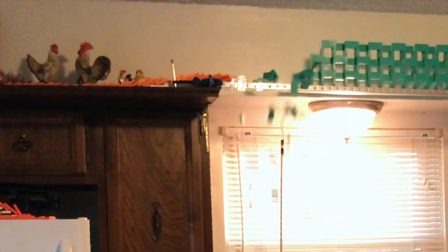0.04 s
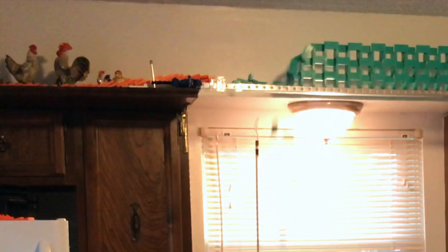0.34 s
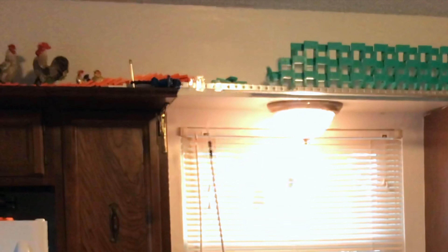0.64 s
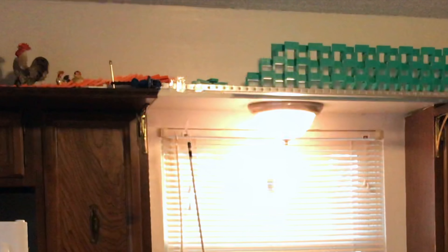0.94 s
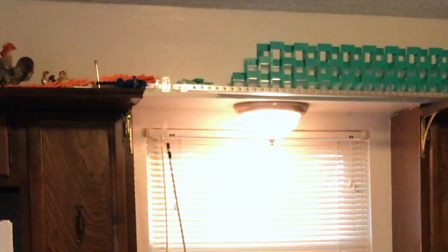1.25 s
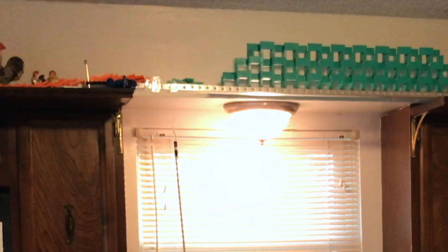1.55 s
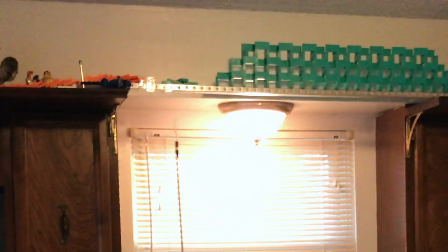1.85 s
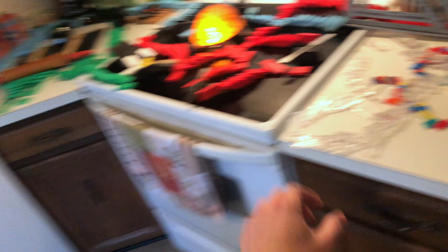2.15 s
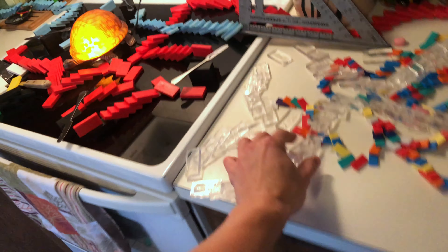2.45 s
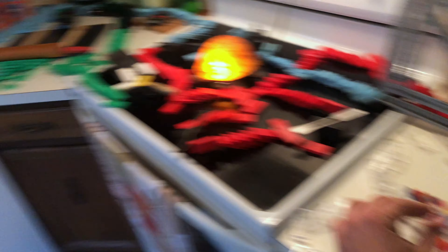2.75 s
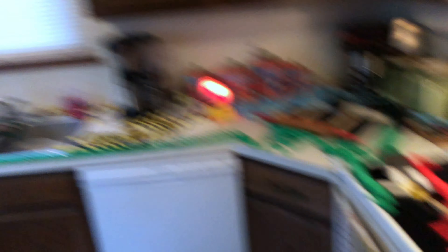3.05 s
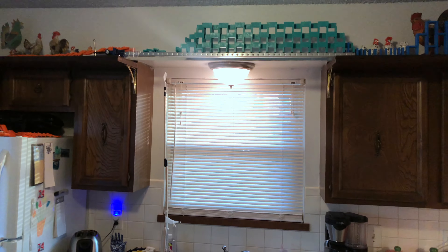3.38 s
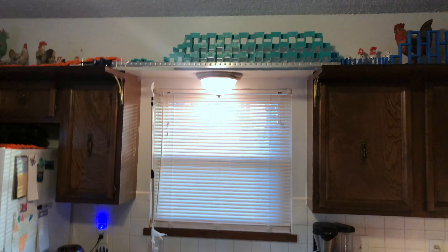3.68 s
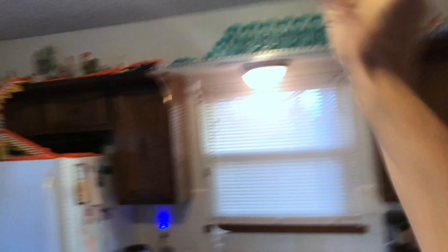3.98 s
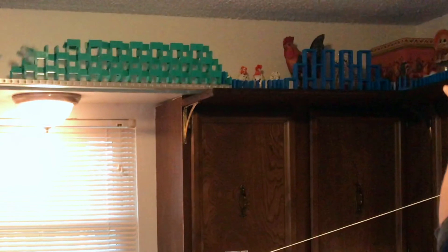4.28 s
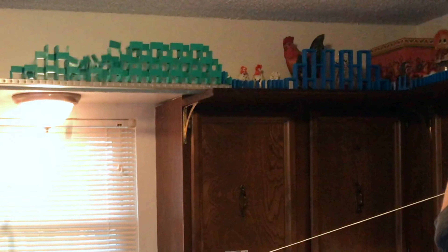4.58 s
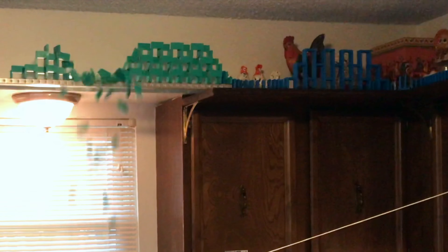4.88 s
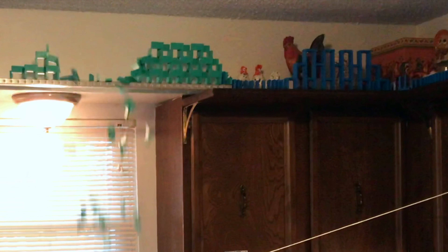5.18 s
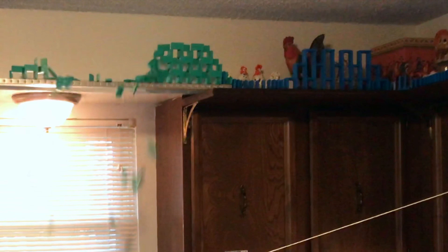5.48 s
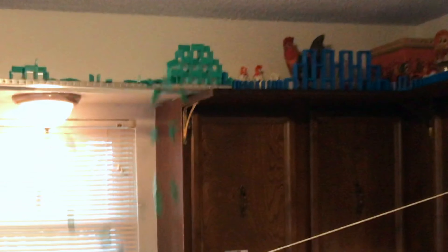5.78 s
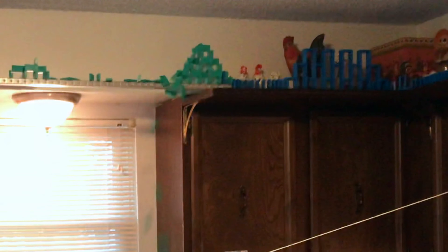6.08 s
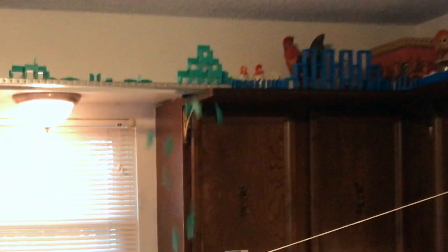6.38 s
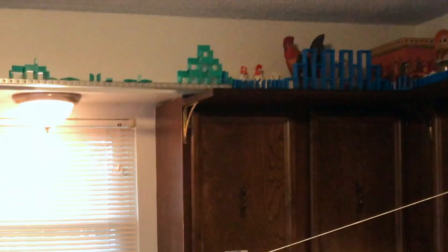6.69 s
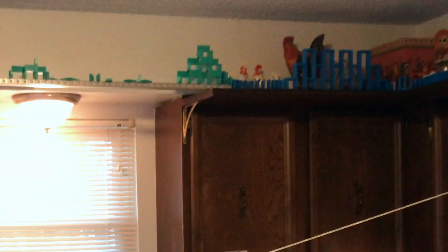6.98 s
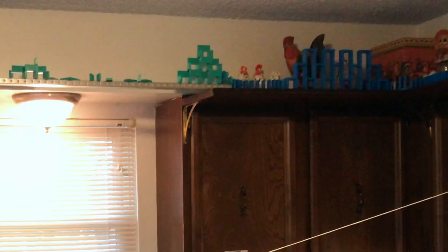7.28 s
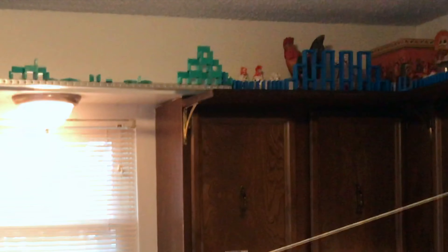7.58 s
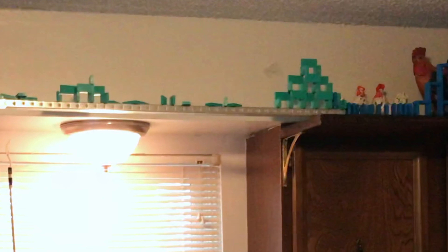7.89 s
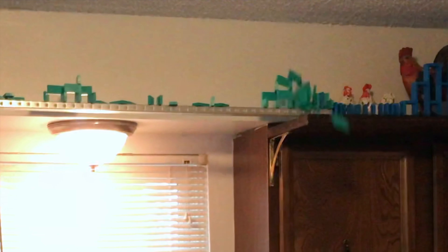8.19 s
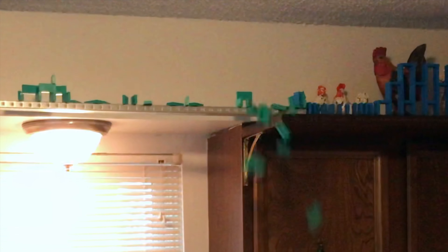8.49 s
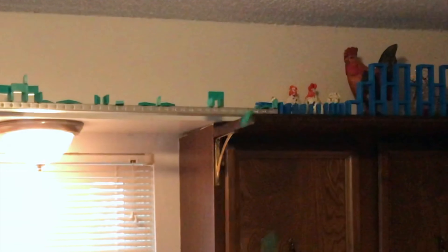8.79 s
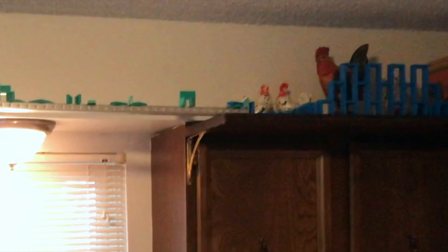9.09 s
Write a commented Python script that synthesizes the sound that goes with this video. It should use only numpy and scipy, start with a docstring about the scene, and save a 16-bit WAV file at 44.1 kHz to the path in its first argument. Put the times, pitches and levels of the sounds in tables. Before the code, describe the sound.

A rapid clatter of toppling plastic dominoes bouncing off wood stops briefly, then resumes, over a faint kitchen appliance hum.

```python
"""A hard little kitchen, heard from one microphone: walls of small plastic dominoes collapse on a high
shelf, and pieces clack together and drop on wooden cabinets. Each big fall is a clack, a knock or a
ringing bounce, buried in near echoes, and stirs up a tumble of smaller contacts. In a pause, lighter
plastic pieces clink close by and the camera is handled. An appliance hums under the room air."""
import sys
import numpy as np
from scipy import signal
from scipy.fft import rfft, irfft, next_fast_len
from scipy.io import wavfile

SR = 44100
rng = np.random.default_rng(int(sys.argv[2]) if len(sys.argv) > 2 else 0)


def unload_audio(sound):
    """Save the sound as a 16-bit wav file, at the path given as the first command line argument."""
    columns = np.transpose(np.atleast_2d(sound))
    # keep every value between -1 and 1, then stretch to whole-number steps
    steps = np.round(np.clip(columns, -1, 1) * 32767)
    wavfile.write(sys.argv[1], SR, steps.astype(np.int16))


N = 403074
NOW = np.arange(N) / SR
SIZE = 16384  # samples in one blow with its echoes
T, HZ = np.arange(SIZE) / SR, np.fft.rfftfreq(SIZE, 1 / SR)


def amp(db):
    """Decibels to gain."""
    return 10 ** (np.asarray(db) / 20)


def along(points, hz):
    """A curve of (freq_hz, value) points, read on a log frequency axis."""
    freqs, values = np.transpose(points)
    return np.interp(np.log(hz + 1), np.log(freqs + 1), values)


def noise(gain):
    """Noise of rms 1, coloured by a gain function of frequency."""
    size = next_fast_len(N + SIZE)
    white = rfft(rng.standard_normal(size))
    coloured = irfft(white * gain(np.fft.rfftfreq(size, 1 / SR)), size)[:N]
    return coloured / np.sqrt(np.mean(coloured ** 2) + 1e-20)


def unit_power(response):
    """A frequency response scaled to mean power 1."""
    return response / np.sqrt(np.mean(abs(response) ** 2))


def pulse(spectrum):
    """Response of the most sudden pulse that has this spectrum (minimum phase)."""
    cepstrum = irfft(np.log(amp(along(spectrum, HZ))))
    cepstrum[1:SIZE // 2] *= 2
    cepstrum[SIZE // 2 + 1:] = 0
    return unit_power(np.exp(rfft(cepstrum)))


def ringing(modes, detune, count=1):
    """Response of count struck pieces, each tuned a little apart; every blow weights the modes anew."""
    hz, db, t60_s = np.transpose(list(modes) * count)[:, :, None]
    hz = hz * (1 + detune * rng.standard_normal(hz.shape))
    width_hz = np.log(1000) / np.pi / t60_s
    gain = amp(db + 2 * rng.standard_normal(hz.shape)) * rng.choice([-1, 1], hz.shape)
    resonances = 1j * HZ / (hz ** 2 - HZ ** 2 + 1j * HZ * width_hz)
    return unit_power(np.sum(gain * np.sqrt(width_hz) * resonances, 0))


def strike(path, colours, levels_db, crest_db):
    """One blow: each colour goes down the path, the rms of its attack set crest_db under its level."""
    layers = irfft(path * np.array(colours), SIZE)
    attack_rms = np.sqrt(np.mean(layers[:, T < .025] ** 2, 1))
    return (amp(np.array(levels_db) - crest_db) / attack_rms) @ layers


# Moments when all ringing stops dead: time_s
DEAD_STOPS = [2.078, 4.184, 7.789, 10]

def add(out, start_s, sound):
    """Lay a sound in at start_s; it lasts until the next dead stop at most."""
    start = max(0, round(start_s * SR))
    stop_s = min(s for s in DEAD_STOPS if s > start_s)
    stop = min(N, start + SIZE, round(stop_s * SR))
    out[start:stop] += sound[:max(0, stop - start)]


# Reverberation of the kitchen: freq_hz, t60_s
ROOM_DECAY = [(150, 0.42), (500, 0.42), (2500, 0.44), (7000, 0.29), (15000, 0.081)]

def kitchen(tail_db, early_t60_s):
    """Path from one spot to the microphone: cabinet echoes bury the direct sound, then a diffuse tail."""
    hz, t, bands = signal.stft(rng.standard_normal(SIZE), SR, nperseg=256)
    decay = amp(-60 * t / along(ROOM_DECAY, hz)[:, None])
    tail = signal.istft(bands * decay, SR, nperseg=256)[1][:SIZE]
    early = rng.standard_normal(SIZE) * amp(-60 * T / early_t60_s)
    return rfft(amp(tail_db) * tail / np.linalg.norm(tail) + early / np.linalg.norm(early))


# Room tone all round the microphone: freq_hz, relative_db
AIR_SPECTRUM = [(20, -42.5), (40, -8.5), (65, -8), (110, -1), (180, -17), (300, -18), (700, -31.5),
                (2000, -37), (15000, -45.5)]
# An appliance in the room: start_s, end_s, pitch_hz, level_db
APPLIANCE_HUMS = [(0, 2.5, 76.6, -54), (3.18, 4.6, 109, -53), (3.25, 4.15, 238.3, -61),
                  (4.15, 15, 79.8, -50.5)]

def air_and_hum():
    """Steady room air and a wavering appliance hum, made of narrow bands of noise that come and go."""
    out = amp(-52) * noise(lambda hz: amp(along(AIR_SPECTRUM, hz)))
    for start, end, pitch_hz, db in APPLIANCE_HUMS:
        gate = np.interp(NOW, [start - .02, start, end, end + .02], [0, 1, 1, 0])
        out += amp(db) * gate * noise(lambda hz: 1 / (1 + ((hz - pitch_hz) / 9) ** 2))
    return out


# Dull low bumps of the camera body and the cabinets: start_s, level_db, pitch_hz
LOW_BUMPS = [(2.936, -32, 166), (2.97, -35.5, 222), (3.139, -34, 156), (5.278, -18, 190),
             (5.498, -19, 175.5), (7.928, -24, 280), (8.891, -25, 187)]
# Contour of the rustle at the microphone: time_s, level_db
RUSTLE_LEVELS = [(2.17, -50.5), (2.37, -62.5), (2.44, -40), (2.68, -55), (2.9, -67), (3.36, -70.5),
                 (3.44, -57), (3.52, -74), (4.1, -59)]

def bumps_and_rustle():
    """Dull low bumps of the camera body and the cabinets, and a soft rustle while the camera moves."""
    out = np.zeros(N)
    partials = [(.5, -14), (1, 3.5), (1.85, -7)]  # pitch_ratio, relative_db
    for s, db, hz in LOW_BUMPS:
        thud = sum(amp(level) * np.sin(2 * np.pi * hz * ratio * T) for ratio, level in partials)
        envelope = amp(db - 60 * T / .086) * (1 - np.exp(-T / .0062))
        add(out, s, envelope * thud)
    rustle = noise(lambda hz: amp(along([(300, -1), (1500, -6), (4500, -9.5), (15000, -20)], hz)))
    return out + amp(np.interp(NOW, *np.transpose(RUSTLE_LEVELS))) * rustle


# Spectra of plastic faces, plastic edges, the shelf and the hollow cabinet: freq_hz, relative_db
CLACK_SPECTRUM = [(400, -13), (1000, 1.5), (2000, 4), (3000, 7), (4200, 8), (5000, 5), (6300, 4.5),
                  (8500, -5), (15000, -46)]
SNAP_SPECTRUM = [(3500, -46), (6000, -4), (7500, 5), (10000, 5.5), (12500, 3), (15800, 1.5)]
KNOCK_SPECTRUM = [(250, -27), (700, -8.5), (1050, 0.5), (1500, 1.5), (2000, -1), (5000, -19.5)]
THUD_SPECTRUM = [(50, -29), (130, -8.5), (350, 1), (520, 0), (800, 7.5), (2500, -53)]

def impact_pulses():
    """Clack, snap, knock and thud at the point of contact, before the room colours them."""
    return map(pulse, [CLACK_SPECTRUM, SNAP_SPECTRUM, KNOCK_SPECTRUM, THUD_SPECTRUM])


# Modes of a light plastic piece: pitch_hz, relative_db, t60_s
LIGHT_MODES = [(5410, 0, .05), (5841, -13, .04), (10550, -21, .08), (12530, -18, .1), (13610, -19, .08)]
# Light pieces close to the microphone: start_s, level_db, snap_offset_db, ring_offset_db
CLOSE_CLINKS = [(2.3956, -36.5, -32, -18), (2.504, -25, -12, -10), (2.5156, -21, -20, -6),
                (2.5385, -20.5, -10.5, -8), (2.5978, -16.5, -18.5, -1.5), (2.6107, -19, -5, 5.5),
                (2.643, -23, -9.5, -1), (2.6612, -22, -8, -11), (2.7633, -36.5, 6, -12),
                (2.818, -39.5, -2, -11), (2.833, -34.5, -21, -6.5), (3.8636, -39.5, -4.5, -20),
                (4.1412, -16, 2.5, 1), (4.156, -15.5, -4, 7), (4.1762, -25, -12, 2),
                (4.2025, -19.5, 1, 11.5), (4.2212, -18.5, -6, 0), (4.245, -23, -6, 1)]

def clinks():
    """Lighter pieces touch close by: a dry tick, then a higher ring that hangs in the room."""
    out = np.zeros(N)
    clack, snap, _, thud = impact_pulses()
    for s, db, snap_db, ring_db in CLOSE_CLINKS:
        near = kitchen(tail_db=-4.5, early_t60_s=.02)
        ring = ringing(LIGHT_MODES, detune=.007, count=3) * kitchen(tail_db=-2.5, early_t60_s=.026)
        levels_db = db + np.array([0, snap_db, -14, ring_db + 1.5])
        add(out, s, strike(1, [clack * near, snap * near, thud * near, ring], levels_db, crest_db=10.5))
    return out


# Single notes among the falls: start_s, level_db, pitch_hz
MODE_PINGS = [(0.067, -16, 1460), (.366, -14, 14900), (.666, -18.5, 9700), (1.059, -20, 10400),
              (2.024, -35, 10400), (2.398, -36.5, 3300), (5.14, -14.5, 877), (6.09, -19, 484),
              (6.201, -18, 9600), (6.545, -18.5, 470)]

def pings():
    """Now and then a blow excites a single mode of a piece or of the wood."""
    out = np.zeros(N)
    for s, db, hz in MODE_PINGS:
        ring = ringing([(hz, 0, .025)], detune=.002)
        add(out, s, strike(kitchen(tail_db=-1.5, early_t60_s=.03), [ring], [db], crest_db=6))
    return out


# Modes of a domino and of the wooden cabinet: pitch_hz, relative_db, t60_s
DOMINO_MODES = [(4300, 0, .05), (9600, -12, .05), (10680, -14, .05)]
CABINET_MODES = [(160, -8.5, 0.085), (255, -10.5, 0.054), (472.5, -1.5, 0.046), (601, 2, 0.026),
                 (698, -0.5, 0.068), (851, 3.5, 0.011)]
# Walls giving way up on the shelf:
# start_s, peak_s, end_s, level_db, fade_db_per_s, wood_offset_db, hardness_db
WALL_COLLAPSES = [(0, .45, 2.07, -34.5, 4, 3, -0.5), (4.389, 5.368, 6.68, -28, 2, 0.5, -1),
                  (6.736, 6.816, 7.78, -33, 8, 1, 1), (7.95, 8.313, 8.78, -33, 28, -5.5, -8.5),
                  (8.8, 8.95, 9.14, -39.5, 12, 2, 0.5)]

def tumble(contacts_per_s=45):
    """Many weaker pieces tip and skitter at random as each collapse builds and fades."""
    build_db, scatter_db = 7.5, 1.79
    stir_db, settle_s = 6, .098  # each big fall stirs up the loose pieces, which then settle
    wood_growth = 1.99  # the wood swells and fades this many times as far in dB as the plastic
    out = np.zeros(N)
    clack, snap, knock, thud = impact_pulses()
    fall_times = np.array([row[0] for row in DOMINO_CLACKS + WOOD_KNOCKS + FREE_BOUNCES])
    for start, peak, end, db, fade_db_per_s, wood_db, hardness_db in WALL_COLLAPSES:
        for slot in np.arange(round(start * contacts_per_s), round(end * contacts_per_s)):
            s = (slot + rng.random()) / contacts_per_s
            swell_db = np.interp(s, [start, peak], [-build_db, 0]) - fade_db_per_s * max(0, s - peak)
            since_fall_s = s - fall_times[fall_times < s].max(initial=0)
            contact_db = db + stir_db * np.exp(-since_fall_s / settle_s)
            contact_db += scatter_db * rng.standard_normal()
            hard_db = swell_db + hardness_db
            parts_db = np.array([swell_db, hard_db - 5.5, wood_db + wood_growth * swell_db, hard_db - 1])
            wood = knock + amp(-2.5) * thud + amp(-3) * ringing(CABINET_MODES, detune=.0082)
            ring = ringing(DOMINO_MODES, detune=.019)
            room = kitchen(tail_db=1, early_t60_s=.1)
            add(out, s, strike(room, [clack, snap, wood, ring], contact_db + parts_db, crest_db=5))
    return out


def contacts(gap_s, graze_db, bounce_db):
    """A grazing touch, the full blow gap_s later, and two weaker bounces."""
    times = gap_s * np.array([0, 1, 2 + rng.random(), 2 + 2 * rng.random()])
    return amp([graze_db, 0, bounce_db, bounce_db]) @ np.exp(-2j * np.pi * np.outer(times, HZ))


def fall(out, s, db, clack_db=0, snap_db=0, knock_db=0, thud_db=0, ring_db=0, pitch_ratio=1):
    """Add one domino landing: plastic clack, edge snap, the wood below and its ring, each offset from db."""
    sliding_gap_s, square_gap_s = .006, .0015  # dull hits slide into contact; bright ones land square
    gap_s = np.interp(snap_db - clack_db, [-20, 0], [sliding_gap_s, square_gap_s])
    touches = contacts(gap_s, graze_db=-6.5, bounce_db=-4.5)
    clack, snap, knock, thud = impact_pulses()
    room = kitchen(tail_db=-.5, early_t60_s=.09)
    treble_room = kitchen(tail_db=8.5, early_t60_s=.029)  # the treble has its own pattern of echoes
    cabinet = thud + amp(2.5) * ringing(CABINET_MODES, detune=.0031)
    modes = [(hz * pitch_ratio, level, t60_s) for hz, level, t60_s in DOMINO_MODES]
    ring = ringing(modes, detune=.01, count=2) * kitchen(tail_db=2.5, early_t60_s=.069)
    colours = [clack * room, snap * treble_room, knock * room, cabinet * room, ring]
    levels_db = db + np.array([clack_db, snap_db, knock_db, thud_db, ring_db])
    add(out, s - gap_s, strike(touches, colours, levels_db, crest_db=12.5))


# Dominoes bouncing clear, out in the room: start_s, level_db, pitch_hz
FREE_BOUNCES = [(0.188, -15, 4300), (1.0032, -11, 4300), (1.056, -13.5, 4300), (1.1415, -19, 4280),
                (1.3621, -14, 4280), (1.4181, -15.5, 4250), (1.6259, -17, 4400), (1.701, -16.5, 4750),
                (1.8199, -20, 4400), (1.924, -13.5, 4400), (2.024, -14, 4440), (4.7074, -16.5, 4250),
                (5.5422, -8.5, 4300), (5.9102, -12.5, 4300), (6.6077, -13, 4280), (6.75, -8.5, 4280),
                (6.924, -14.5, 4280), (7.068, -15.5, 4250), (7.232, -18.5, 4280), (7.4387, -12, 4280),
                (7.773, -23.5, 4300), (8.981, -15.5, 4250), (9.035, -20, 4340)]

def bounces():
    """A piece springs clear after a light contact and rings freely at its own pitch."""
    out = np.zeros(N)
    for s, db, hz in FREE_BOUNCES:
        ratio = hz / DOMINO_MODES[0][0]
        fall(out, s, db, clack_db=-4, snap_db=-8.5, knock_db=-10.5, thud_db=-14, pitch_ratio=ratio)
    return out


# Dominoes landing on the shelf and cabinets: start_s, level_db, thud_offset_db
WOOD_KNOCKS = [(0.0654, -15, -0.5), (0.2782, -9.5, -8), (0.3007, -11, -26.5), (0.7494, -10.5, -17.5),
               (0.919, -24.5, -3.5), (0.9676, -13, -7.5), (1.1073, -12, -6.5), (1.499, -11, 0),
               (4.3424, -27, 1.5), (4.8285, -9.5, -5), (4.8596, -11, -10.5), (5.1242, -11.5, 4),
               (5.2729, -38, -2.5), (5.374, -10, -31.5), (5.4214, -18, -24), (5.5952, -9.5, 1.5),
               (5.6886, -12.5, -20), (6.086, -12.5, 0.5), (6.362, -13, 1), (6.386, -15, -14),
               (6.5386, -16, 5.5), (6.799, -15, -29), (8.8019, -21, -2.5), (9.0502, -22.5, -4.5)]

def knocks():
    """Plastic on wood, which damps the piece; the deeper it lands, the more the hollow cabinet booms."""
    out = np.zeros(N)
    for s, db, thud_db in WOOD_KNOCKS:
        fall(out, s, db, clack_db=-3, snap_db=-13, thud_db=thud_db, ring_db=-16)
    return out


# Domino striking domino, up on the shelf: start_s, level_db, hardness_db
DOMINO_CLACKS = [(.0014, -9, -6.5), (0.0211, -10, 1), (0.3647, -10.5, -3), (0.3986, -7, -10),
                 (0.4912, -10, -7), (0.6046, -9, -0.5), (0.6687, -11, -16.5), (.8583, -19, 8),
                 (1.056, -19.5, 7.5), (1.2345, -16.5, 2.5), (1.3276, -11, -2.5), (1.8216, -14.5, 4.5),
                 (1.8503, -17.5, -19.5), (2.0504, -17.5, -11), (4.5216, -11.5, -29), (4.626, -9.5, -2),
                 (4.975, -13.5, -3.5), (5.0854, -12, -6), (5.318, -5.5, -10), (5.7821, -12, -6.5),
                 (5.8683, -13, 5.5), (6.017, -15, -0.5), (6.1514, -13.5, -3.5), (6.1978, -23, 9.5),
                 (6.3115, -10.5, -3), (6.5393, -13, -1.5), (6.926, -13, 2.5), (6.9664, -19, 13),
                 (7.3726, -16.5, 0.5), (7.5326, -32, 10.5), (7.61, -16.5, 7.5), (7.9271, -6.5, -12.5),
                 (8.0332, -17.5, -12), (8.2025, -9.5, -29.5), (8.26, -20, -22), (8.2395, -17.5, -18),
                 (8.2721, -11, -0.5), (8.4064, -16, -13.5), (8.6425, -20, -11.5), (8.7385, -15.5, -7),
                 (8.8883, -5.5, -8.5), (9.1243, -11.5, -4.5)]

def clacks():
    """Plastic on plastic: a square hit is hard and its edges snap, a sliding one is dull."""
    out = np.zeros(N)
    for s, db, hardness_db in DOMINO_CLACKS:
        fall(out, s, db, snap_db=hardness_db, knock_db=-14, thud_db=-16, ring_db=-11.5)
    return out


def scene():
    """Everything in the kitchen, at one microphone."""
    dominoes = clacks() + knocks() + bounces() + pings() + tumble()
    return (dominoes + clinks() + bumps_and_rustle() + air_and_hum())[None]


def record(dry):
    """The camera rounds off the highest peaks and keeps nothing above its band limit."""
    ceiling, top_hz = .52, 15900
    rounded = dry / (1 + abs(dry / ceiling) ** 4) ** (1 / 4)
    size = next_fast_len(N + SIZE)
    passband = np.fft.rfftfreq(size, 1 / SR) < top_hz
    return irfft(rfft(rounded, size) * passband, size)[:, :N]


dry = scene()
out = record(dry)
unload_audio(out)
```